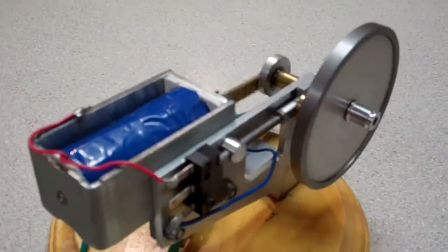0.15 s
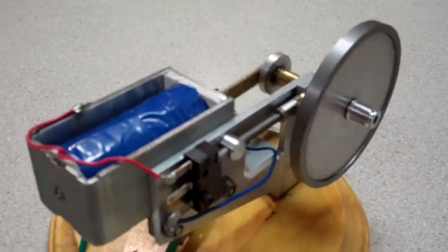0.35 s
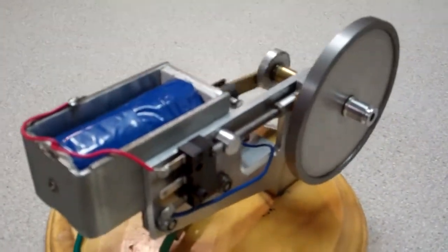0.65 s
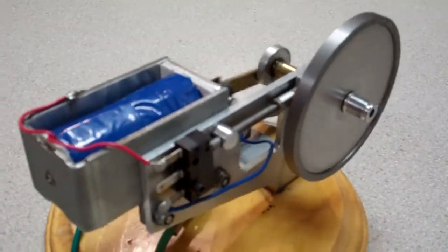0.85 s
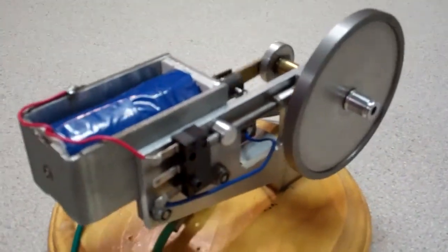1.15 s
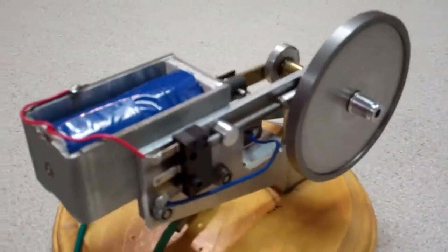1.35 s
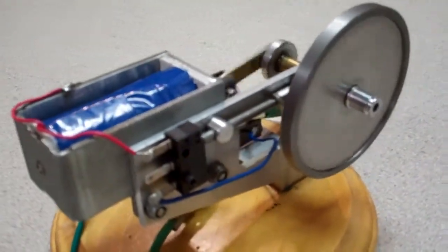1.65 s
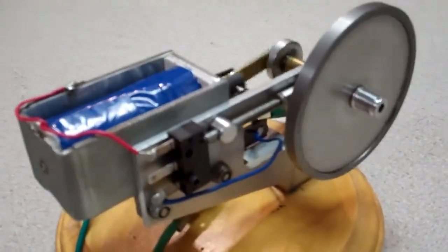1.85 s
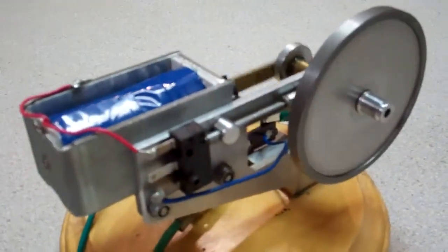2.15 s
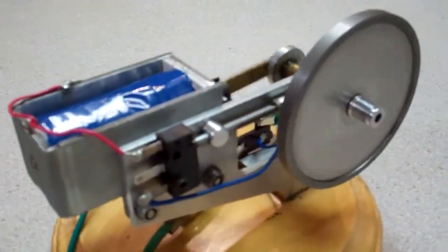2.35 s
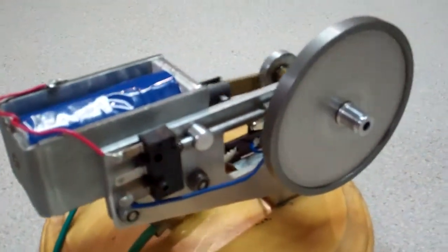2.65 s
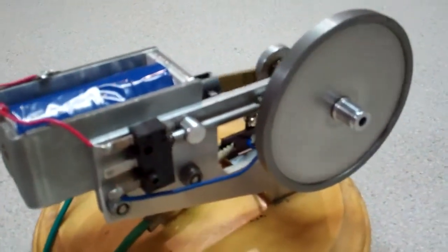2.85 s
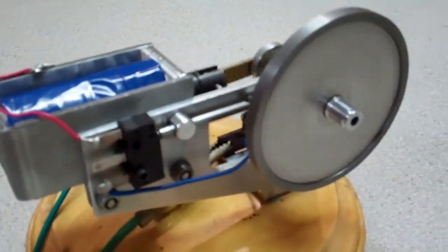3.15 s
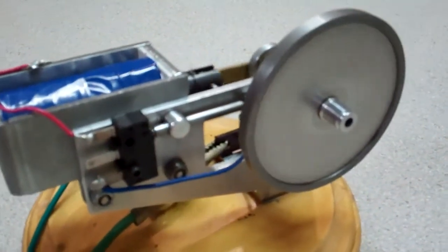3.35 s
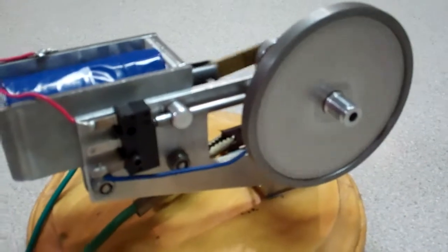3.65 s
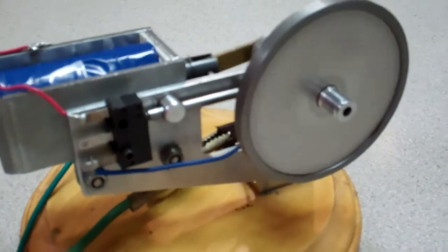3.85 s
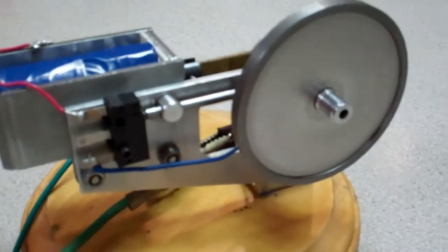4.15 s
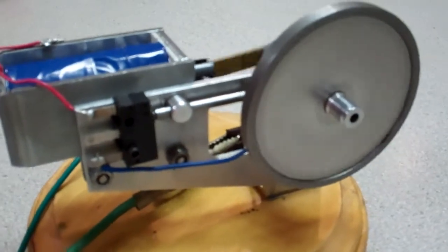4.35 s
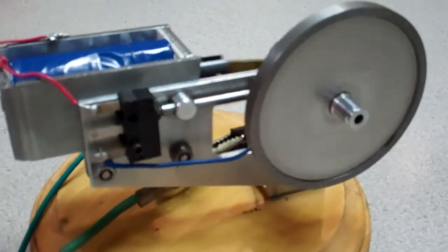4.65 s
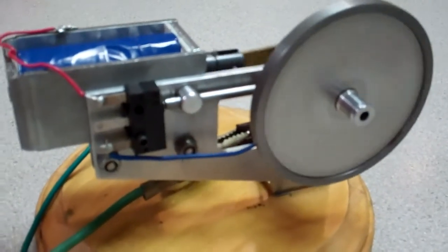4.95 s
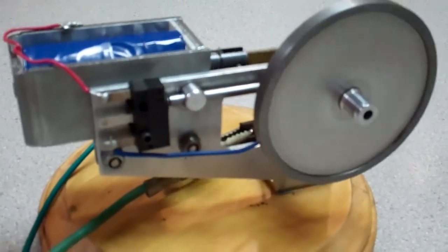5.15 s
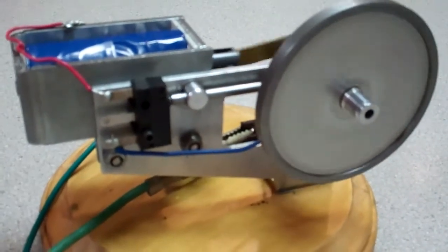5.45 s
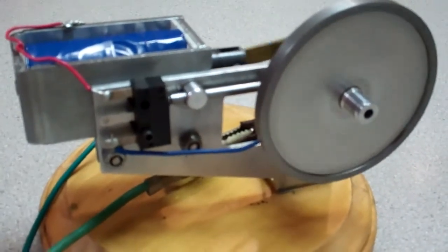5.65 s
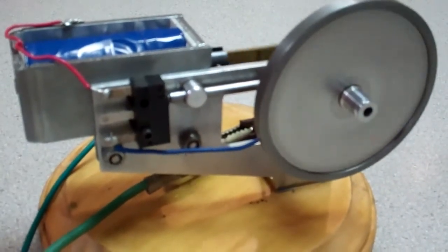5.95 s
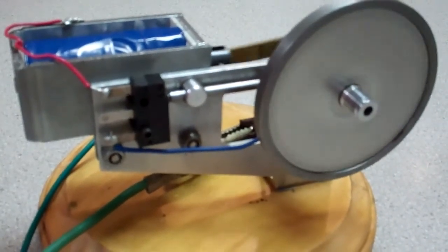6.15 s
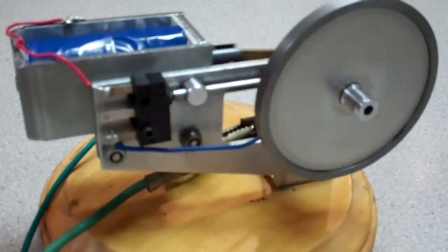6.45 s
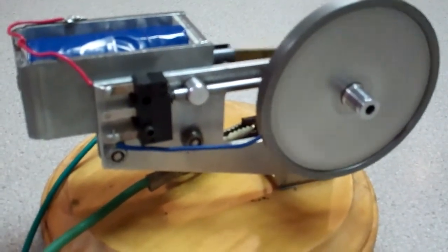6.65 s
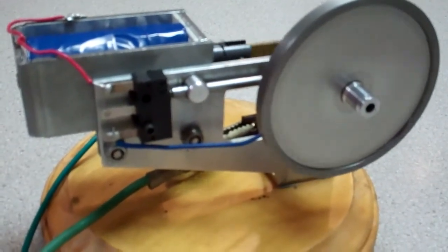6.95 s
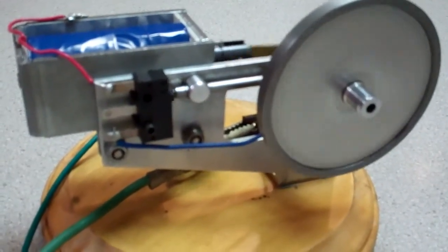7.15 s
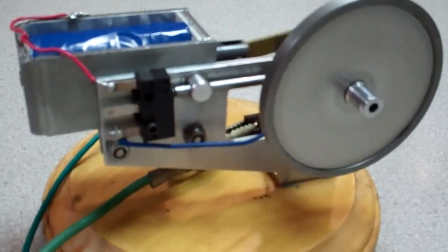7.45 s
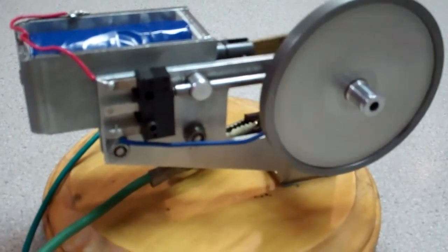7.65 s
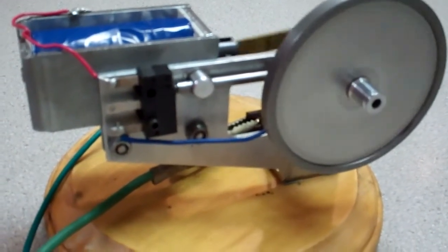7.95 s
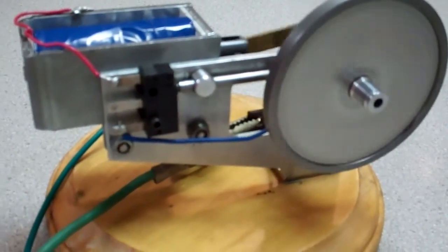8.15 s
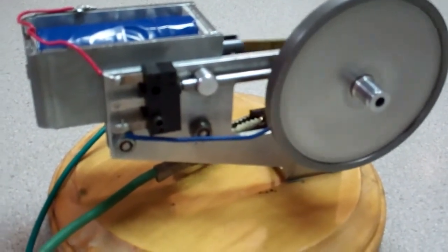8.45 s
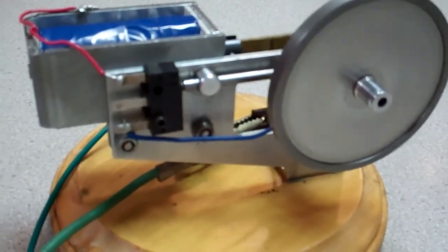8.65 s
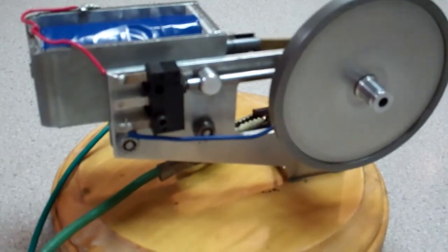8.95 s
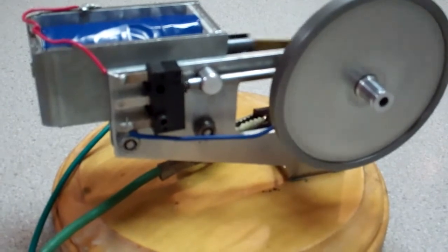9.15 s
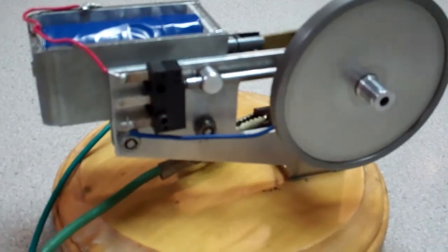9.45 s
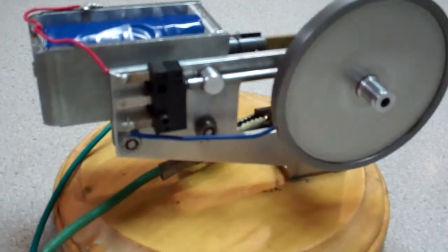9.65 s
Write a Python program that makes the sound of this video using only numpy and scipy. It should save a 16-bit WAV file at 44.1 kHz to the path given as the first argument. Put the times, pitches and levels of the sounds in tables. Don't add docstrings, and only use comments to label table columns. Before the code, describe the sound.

Crisp, dry metallic ticking from a little flywheel motor, paired snaps five and a half times a second, with faint room hush behind.

```python
import sys
import numpy as np
from scipy import signal
from scipy.fft import rfft, irfft, next_fast_len
from scipy.io import wavfile
from scipy.ndimage import uniform_filter1d, minimum_filter1d, map_coordinates

SR = 44100
rng = np.random.default_rng(int(sys.argv[2]) if len(sys.argv) > 2 else 0)


def inscribe(sig):
    pcm = np.round(np.clip(np.atleast_2d(sig).T, -1, 1) * 32767)
    wavfile.write(sys.argv[1], SR, pcm.astype(np.int16))


def attenuation_scalar(level_db):
    decades = np.asarray(level_db, float) / 20
    return 10 ** decades


N = 431737


def along(points, hz):
    f, v = np.transpose(points)
    return np.interp(np.log(hz + 1), np.log(f + 1), v)


def coloured(x, points):
    m = next_fast_len(x.shape[-1] + 1024)
    gain = attenuation_scalar(along(points, np.fft.rfftfreq(m, 1 / SR)))
    return irfft(rfft(x, m) * gain, m)[..., :x.shape[-1]]


def laid(times, sounds, db):
    energy = np.sum(sounds ** 2, axis=(1, 2)) / (.006 * SR)
    sounds = sounds * (attenuation_scalar(db - 2) / np.sqrt(energy))[:, None, None]
    at = np.round(times * SR).astype(int)[:, None] + np.arange(sounds.shape[2]) + SR
    sides = [np.bincount(at.ravel(), sounds[:, c].ravel(), N + 3 * SR) for c in (0, 1)]
    return np.array(sides)[:, SR:N + SR]


def tick(times, db, colour, ms, alike, pan_db, scatter_ms=0.22, fresh=0.95):
    t = np.arange(-128, 896) / SR
    draw = rng.standard_normal((len(times), 3, len(t)))
    draw = fresh * draw + (1 - fresh) * draw[0]
    noise = alike * draw[:, :1] + (1 - alike) * draw[:, 1:]
    burst = noise * np.maximum(t, 0) * np.exp(-2000 * np.abs(t) / ms)
    late = scatter_ms * rng.standard_normal(len(times)) / 1000
    panned = coloured(burst, colour) * attenuation_scalar([[pan_db / 2], [-pan_db / 2]])
    return laid(times + late + t[0], panned, db)


def strength(times, usual_db, scatter_db, lively_db, lively):
    chance = rng.standard_normal(len(times))
    db = np.minimum(usual_db + scatter_db * chance, (usual_db + lively_db) / 2)
    db[lively] = lively_db + scatter_db / 4 * chance[lively]
    return db


# frequency in Hz, level in dB per Hz.
AIR_COLOUR = [(18, -57), (30, -27), (123, -14), (196, -8), (267, -10), (674, -17), (2310, -22.5),
              (4290, -15.5), (7750, -19.5), (8590, -14.5), (10600, -16.5), (11700, -13.5), (14000, -14)]
# frequency in Hz, left-right likeness from 0 to 1.
AIR_LIKENESS = [(60, 0.88), (130, 1), (300, 0.9), (640, 0.61), (1400, 0.82), (3100, 0.46), (7000, 0)]


def air():
    m = next_fast_len(N)
    hz = np.fft.rfftfreq(m, 1 / SR)
    turn = np.arccos(np.clip(along(AIR_LIKENESS, hz), -1, 1)) / 2
    noise = rfft(rng.standard_normal((2, m))) * attenuation_scalar(along(AIR_COLOUR, hz))
    mid, side = irfft(noise * [np.cos(turn), np.sin(turn)], m)[:, :N]
    hush = np.array([mid + side, mid - side])
    return attenuation_scalar(-58) * hush / np.std(hush)


# frequency in Hz, level in dB.
HUM_LINES = [(240, -79.5), (360, -77.5), (480, -78.5)]


def mains_hum():
    t = np.arange(N) / SR
    return sum(attenuation_scalar(db + 2.5) * np.sin(2 * np.pi * hz * t + rng.uniform(0, 2 * np.pi))
               for hz, db in HUM_LINES)


# middle in seconds, level in dB, length in ms.
FAR_CHIRPS = [(.4, -62, 29), (1.432, -62, 17), (1.456, -60, 7.8), (2.48, -67, 12), (2.508, -66, 21),
              (4.58, -66, 13), (6.146, -62, 13), (6.685, -64, 20), (7.198, -66, 70), (7.741, -61, 19),
              (8.25, -66, 10)]


def far_chirp():
    t = np.arange(N) / SR
    fuzz = coloured(rng.standard_normal(N), [(1900, -50), (2330, 2), (2530, -3), (3000, -29)])
    swell = sum(attenuation_scalar(db) * np.exp(-(2000 * (t - s) / ms) ** 2 / 2) for s, db, ms in FAR_CHIRPS)
    return swell * fuzz / np.std(fuzz)


# start in seconds, level in dB.
GRIP_SHIFTS = [
    (4.467, -64),
    (4.528, -56.5),
    (4.546, -60),
    (4.573, -53),
    (4.66, -64),
    (4.24, -64),
    (4.33, -67),
    (7.209, -57),
]
# frequency in Hz, level in dB per Hz.
KNOCK_COLOUR = [(70, -43), (150, -10), (400, -7), (800, -1.5), (1200, -3), (2200, -17)]


def camera_grip():
    s, db = np.transpose(GRIP_SHIFTS)
    return tick(s, db + 6.0, KNOCK_COLOUR, ms=3.9, alike=0.71, pan_db=0.0)


# delay in ms, level in dB.
NEAR_WALLS = [(6, -42), (10.5, -38), (20.5, -36), (25, -38), (31, -39), (38.5, -38)]
# frequency in Hz, time to fall 60 dB in seconds.
ROOM_FADE = [(200, 0.58), (2000, 0.44), (5000, 0.33), (10000, 0.25), (14000, 0.27)]
# frequency in Hz, level in dB.
ROOM_COLOUR = [(200, 6.5), (1000, 2.5), (3000, 2), (4500, 1), (7500, 4.5), (12000, -1), (14200, 0),
               (14600, -22)]


def room(x, places=5):
    t = np.arange(SR // 2) / SR
    source = x.mean(axis=0)
    where = np.linspace(0, places - 1, N)
    wet = np.zeros((2, N))
    for place in range(places):
        hz, s, z = signal.stft(rng.standard_normal((2, len(t))), SR, nperseg=256)
        fade = attenuation_scalar(-60 * s / along(ROOM_FADE, hz)[:, None])
        tail = signal.istft(z * fade, SR, nperseg=256)[1][:, :len(t)]
        lumps = map_coordinates(rng.standard_normal(400), [t * 700], order=1)
        tail = tail * (1 - np.exp(-np.maximum(t - .003, 0) / 0.012)) * attenuation_scalar(lumps)
        tail = attenuation_scalar(-17.0) * tail / np.linalg.norm(tail[0])
        for ms, db in NEAR_WALLS:
            tail[:, round(ms * SR / 1000):][:, :8] += attenuation_scalar(db - 3) * rng.standard_normal((2, 8))
        share = np.sqrt(np.clip(1 - np.abs(where - place), 0, 1))
        wet += signal.fftconvolve((share * source)[None], tail, axes=1)[:, :N]
    return coloured(wet, ROOM_COLOUR)


# frequency in Hz, level in dB, time to fall 60 dB in seconds.
BASE_MODES = [(164.5, -103, 0.032), (190.5, -60.5, 0.27), (203.7, -59, 0.33), (252, -64, 0.055),
              (358.2, -57, 0.11), (384, -68.5, 0.19), (485.5, -63.5, 0.08), (613, -69, 0.042)]


def base(opened):
    t = np.arange(SR // 2) / SR
    knock = sum(attenuation_scalar(db - 60 * t / t60) * np.sin(2 * np.pi * hz * t) for hz, db, t60 in BASE_MODES)
    knock = knock * (1 - np.exp(-t / 0.0029))
    blows = np.zeros(N)
    blows[np.round((opened + .0048) * SR).astype(int)] = attenuation_scalar(rng.standard_normal(len(opened)))
    return signal.fftconvolve(blows, knock)[:N] * attenuation_scalar([[4.6], [5.4]])


# frequency in Hz, level in dB per Hz.
BOUNCE_COLOUR = [(400, -5), (1500, 0.5), (3500, 12), (6000, -4), (9000, -4), (12000, 11), (15000, -4)]
CAM_COLOUR = [(500, -3.5), (1500, -6), (3800, 11.5), (5500, -47), (9000, -15), (12000, -13), (15000, -18)]
PIN_COLOUR = [(500, -40), (1600, 1), (3500, -9), (5700, -6), (7500, -0.5), (9000, 3), (12000, -10),
              (15000, -4)]
LANDING_COLOUR = [(800, -1), (2500, -43), (4300, 12.5), (5000, 7.5), (5700, -4), (6800, -2), (10000, 8),
                  (15000, -26)]
SCRAPE_COLOUR = [(350, -0.5), (850, -9), (1500, 0), (2500, -4), (4000, 3), (5700, 1.5), (7000, -1.5),
                 (12000, 6.5), (15000, -13)]
LIVELY_BOUNCES = [0, 8, 14, 20, 27, 28, 32, 41, 42, 52, 54]
LIVELY_CAMS = [10, 11, 12, 18, 20, 24, 25, 26, 43]
LIVELY_PINS = [4, 7, 10, 11, 12, 13, 14, 24, 25, 41, 44, 51]
LIVELY_LANDINGS = [0, 8, 17, 22, 24, 25, 26, 39, 44, 49]


def linkage(shut, ring_db, opened):
    bounce_db = strength(shut, usual_db=-56.5, scatter_db=5.5, lively_db=-45, lively=LIVELY_BOUNCES)
    cam_db = strength(opened, usual_db=-49.5, scatter_db=2.5, lively_db=-47, lively=LIVELY_CAMS)
    pin_db = strength(opened, usual_db=-47.5, scatter_db=7.5, lively_db=-42.5, lively=LIVELY_PINS)
    landing_db = strength(opened, usual_db=-48, scatter_db=3.8, lively_db=-45.5, lively=LIVELY_LANDINGS)
    return (tick(shut - .0068, ring_db - 31.0, BOUNCE_COLOUR, ms=6.7, alike=0.14, pan_db=8.0)
            + tick(shut + .013, bounce_db, SCRAPE_COLOUR, ms=7.3, alike=0.68, pan_db=-2.0, scatter_ms=0.93)
            + tick(shut + .0105, bounce_db + 7, BOUNCE_COLOUR, ms=0.72, alike=0.64, pan_db=-2.0)
            + tick(opened - .0165, cam_db + 1.5, CAM_COLOUR, ms=0.86, alike=0.83, pan_db=-1.5)
            + tick(opened - .0102, pin_db + 7.0, PIN_COLOUR, ms=0.87, alike=0.84, pan_db=1.5)
            + tick(opened + 0.0042, landing_db + 6.5, LANDING_COLOUR, ms=1.87, alike=0.92, pan_db=-3.0)
            + tick(opened - .016, cam_db + 7.0, SCRAPE_COLOUR, ms=20, alike=0.93, pan_db=7.0, scatter_ms=1.5)
            + tick(opened - .002, landing_db + 9.5, SCRAPE_COLOUR, ms=4.5, alike=0.61, pan_db=11.5,
                   scatter_ms=2.4))


# time in seconds, turns per second.
FLYWHEEL_SPEED = [(0, 5.5379), (1.4, 5.5366), (1.9, 5.5067), (2.4, 5.4356), (2.8, 5.5108), (3.9, 5.5342),
                  (4.2, 5.5316), (5.3, 5.5805), (6.1, 5.5322), (7.3, 5.5386), (7.9, 5.6059), (9.8, 5.5175)]
# time in seconds, level of the shut snap in dB,
# level of the open snap in dB, dull part of the shut snap in dB, dull part of the open snap in dB.
SNAP_LEVELS = [(0, -13.5, -18.5, 2, -3.5), (1.4, -13.5, -19.5, 0.5, 3), (2.2, -13, -17.5, 0, 6.5),
               (2.9, -14.5, -19, 0.5, 4.5), (3.9, -14.5, -18.5, 1, 3), (4.7, -12.5, -16.5, 1.5, 2.5),
               (6, -13, -16.5, 0.5, -5), (7.8, -13, -16.5, 2, -4), (8.9, -13, -17, -4.5, -5.5),
               (9.8, -13.5, -17.5, 2, 1)]


def snaps():
    shut_angle, open_angle = .161, .5248
    t = np.arange(N) / SR
    turned = np.cumsum(np.interp(t, *np.transpose(FLYWHEEL_SPEED))) / SR
    shut = np.interp(np.arange(shut_angle, turned[-1]), turned, t)
    opened = np.interp(np.arange(open_angle, turned[-1]), turned, t)
    s, shut_db, open_db, shut_dull, open_dull = np.transpose(SNAP_LEVELS)
    return ((shut, np.interp(shut, s, shut_db), np.interp(shut, s, shut_dull)),
            (opened, np.interp(opened, s, open_db), np.interp(opened, s, open_dull)))


# time in seconds, place from 0 (side) to 1 (front).
CAMERA_PATH = [
    (0, 0.14),
    (1, -0.27),
    (2.4, -0.45),
    (3.2, 0.78),
    (4.5, 1.17),
    (6, 1.29),
    (9.8, 0.97),
]


def snap(times, db, modes, rise_ms, stop_ms, loose):
    t = np.arange(600) / SR
    hz, width, *levels = np.transpose(modes)
    side, front = np.reshape(levels, (2, 2, -1))
    seen = np.interp(times, *np.transpose(CAMERA_PATH))[:, None, None]
    chance = rng.standard_normal((len(times), 2, 2, len(hz)))
    start, turn = rng.uniform(0, 2 * np.pi, (2, 2, len(hz)))
    gain = attenuation_scalar(side + seen * (front - side) + 2.85 * chance[:, 0])
    phase = start + 0.54 * seen * turn + loose * chance[:, 1]
    rise = (1 - np.exp(-1000 * t / rise_ms)) ** 2
    stilled = hz[:, None] / 48000.0 + np.exp(-(1000 * t / stop_ms) ** 3)
    shape = rise * stilled * np.exp(-1.6 * width[:, None] * t)
    ring = shape * np.sin(2 * np.pi * hz[:, None] * t + phase[..., None])
    return laid(times, np.sum(gain[..., None] * ring, axis=2), db)


LIVELY_THUDS = [3, 11, 22, 27, 28, 31, 32, 38, 39, 42, 43, 44, 49, 50, 52, 53]


def thud(times, ms, unlike_db):
    t = np.arange(-128, 128) / SR
    alike_db = strength(times, usual_db=-50, scatter_db=8, lively_db=-44, lively=LIVELY_THUDS)
    alike = attenuation_scalar(alike_db) * np.sign(rng.standard_normal(len(times)))
    unlike = attenuation_scalar(unlike_db) * rng.standard_normal(len(times))
    sizes = np.transpose([alike + unlike, alike - unlike])
    push = sizes[..., None] * np.exp(-(1000 * t / ms) ** 2)
    return laid(times + t[0] + .001, push, 10 * np.log10(np.mean(sizes ** 2, axis=1)))


# frequency in Hz, width in Hz, left and right level
# in dB from the side, left and right level in dB from the front.
SHUT_RING = [(6900, 380, -20, -20, -13, -16), (8650, 380, -10, -11, -6, -11),
             (9450, 380, -11, -11, -10, -6), (10250, 380, -7, -9, -7, -6), (11500, 380, 3, 0, 6, -3),
             (11950, 380, -7, -9, 3, -5), (12900, 380, -4, -9, -2, -7), (14000, 380, 3, -2, -2, -1)]
OPEN_RING = [(4200, 380, -22, -22, -22, -20), (5500, 380, -23, -25, -21, -20),
             (6800, 380, -30, -27, -21, -23), (8600, 380, -16, -16, -6, -16),
             (9500, 380, -17, -13, -8, -11), (10450, 380, -7, -14, -8, -16), (11500, 380, -11, -7, 0, -15),
             (12800, 380, -6, -7, 0, -11), (13300, 380, -6, -14, -6, -6), (14100, 380, -16, -21, -15, -18)]
# frequency in Hz, level in dB per Hz.
CRACK_COLOUR = [(500, -44), (1300, 0), (3000, 3.5), (5000, 3), (8000, 3.5), (16000, 1.5)]
SHUT_TO_WALLS = [(500, -26), (3000, -24.5), (6800, -22), (7700, -22), (8600, -11.5), (10300, -4),
                 (11600, 3), (12400, -5.5), (14000, -10.5)]
OPEN_TO_WALLS = [(500, -20.5), (3000, -36), (4300, -10), (5000, -20), (6000, -11), (7600, -21.5),
                 (8700, -13), (11500, 2), (13000, -4), (14200, -7.5)]
LIVELY_CRACKS = [5, 6, 8, 9, 12, 18, 21]
LIVELY_KNOCKS = [5, 6, 9, 11, 13, 14, 15, 17, 18, 19, 21, 24, 34, 35, 42, 43, 46, 47, 53]


def switch(shut, ring_db, dull_db, opened, release_db, slap_db):
    ring = (snap(shut, ring_db, SHUT_RING, rise_ms=0.92, stop_ms=2.08, loose=0.12)
            + snap(opened, release_db, OPEN_RING, rise_ms=.3, stop_ms=2.7, loose=.3))
    crack_db = dull_db + strength(shut, usual_db=-31, scatter_db=2.5, lively_db=-28.5, lively=LIVELY_CRACKS)
    knock_db = 0.84 * dull_db + strength(shut, usual_db=-45.5, scatter_db=5.5, lively_db=-38,
                                         lively=LIVELY_KNOCKS)
    slap_db = release_db + slap_db
    crack = (tick(shut, crack_db + 6.5, CRACK_COLOUR, ms=0.79, alike=0.17, pan_db=4.0,
                  scatter_ms=0.043, fresh=0.83)
             + tick(shut, knock_db + 4.5, KNOCK_COLOUR, ms=0.84, alike=0.27, pan_db=10.0, scatter_ms=0.18)
             + thud(shut, ms=0.48, unlike_db=-45.5)
             + tick(opened, slap_db - 18, CRACK_COLOUR, ms=0.76, alike=0.61, pan_db=-11.5, scatter_ms=0.049)
             + tick(opened, slap_db - 25.5, KNOCK_COLOUR, ms=0.76, alike=0.16, pan_db=-14.5, scatter_ms=0.24))
    spread = (tick(shut, ring_db - .5, SHUT_TO_WALLS, ms=0.31, alike=0.64, pan_db=-10.0,
                   scatter_ms=0, fresh=0.16)
              + tick(opened, release_db - .5, OPEN_TO_WALLS, ms=0.28, alike=1.0, pan_db=16,
                     scatter_ms=0, fresh=0.17))
    return ring + crack, spread + attenuation_scalar(-6.0) * ring


def scene():
    shut, opened = snaps()
    direct, spread = switch(*shut, *opened)
    slack = linkage(*shut[:2], opened[0])
    engine = direct + slack + base(opened[0])
    background = air() + mains_hum() + far_chirp() + camera_grip()
    return engine + room(spread + slack) + background


def starved(x, size, band, lo_hz, hi_hz, weak):
    hz, _, z = signal.stft(x, SR, nperseg=size)
    power = np.add.reduceat(np.sum(np.abs(z) ** 2, axis=0), np.arange(0, len(hz), band), axis=0)
    drop = np.repeat(weak(10 * np.log10(power + 1e-14)), band, axis=0)[:len(hz)]
    drop &= ((hz > lo_hz) & (hz < hi_hz))[:, None]
    return signal.istft(z * ~drop, SR, nperseg=size)[1][:, :N]


def faint(db, margin_db, calm_db, whim_db):
    loudest = db.max(axis=0)
    calm = loudest < np.median(loudest) + calm_db
    whim = whim_db * uniform_filter1d(rng.standard_normal(db.shape), size=5, axis=1)
    lower = db - uniform_filter1d(db, size=7, axis=0) + whim
    return (uniform_filter1d(np.where(calm, lower, 0), size=3, axis=1) < -margin_db) & calm


def overshadowed(db):
    loudest_near = -minimum_filter1d(-db.max(axis=0), size=7)
    return db + 5 * rng.standard_normal(db.shape) < loudest_near - 47


def top_cut(x):
    return signal.sosfilt(signal.butter(12, 16470, fs=SR, output="sos"), x)


# frequency in Hz, level in dB.
BAND_EDGE = [(14220, 0), (14320, -12), (14700, -6), (15300, -12), (16300, -23), (16800, -50)]


def record(dry):
    x = coloured(dry, BAND_EDGE)
    x = starved(x, size=1024, band=5, lo_hz=2900, hi_hz=8000,
                weak=lambda db: faint(db, margin_db=1.7, calm_db=11, whim_db=5))
    x = starved(x, size=256, band=4, lo_hz=2550, hi_hz=7500, weak=overshadowed)
    x = starved(x, size=256, band=4, lo_hz=14100, hi_hz=20000, weak=lambda db: db < -66)
    return top_cut(x)


dry = scene()
out = record(dry)
inscribe(out)
```